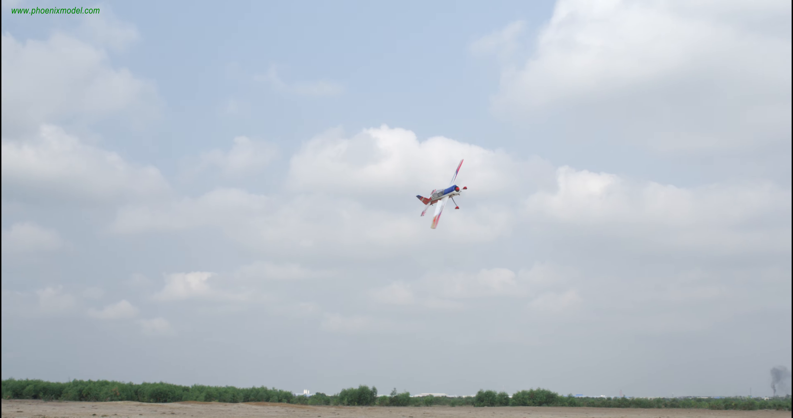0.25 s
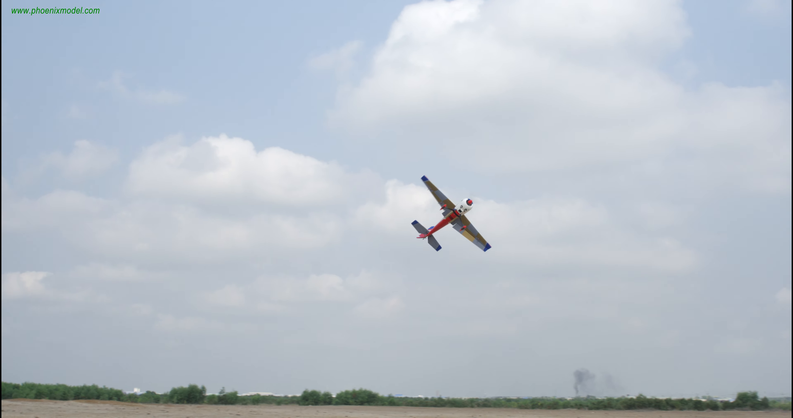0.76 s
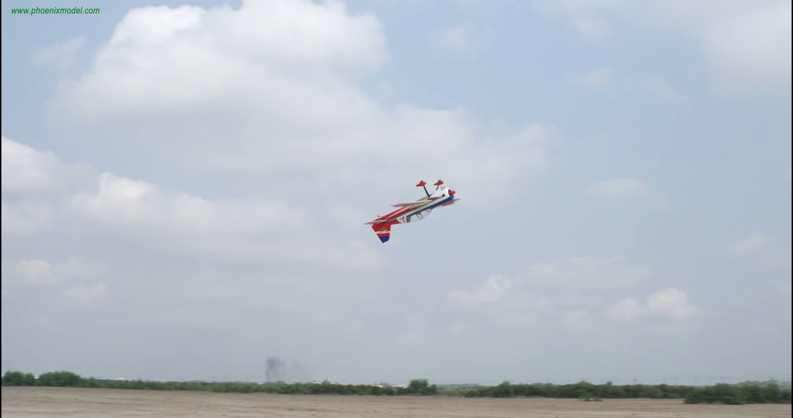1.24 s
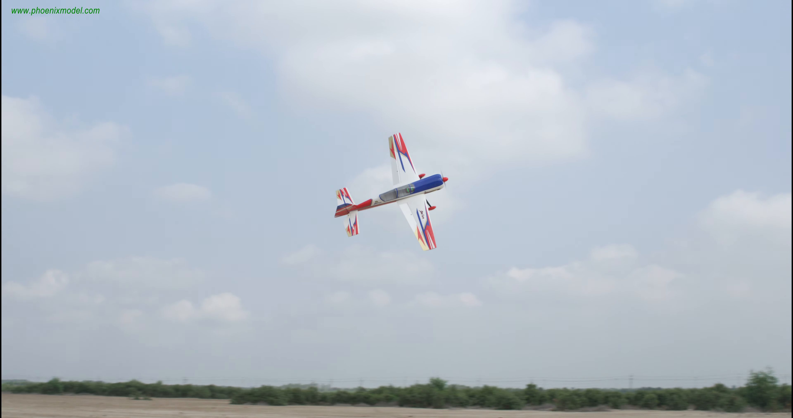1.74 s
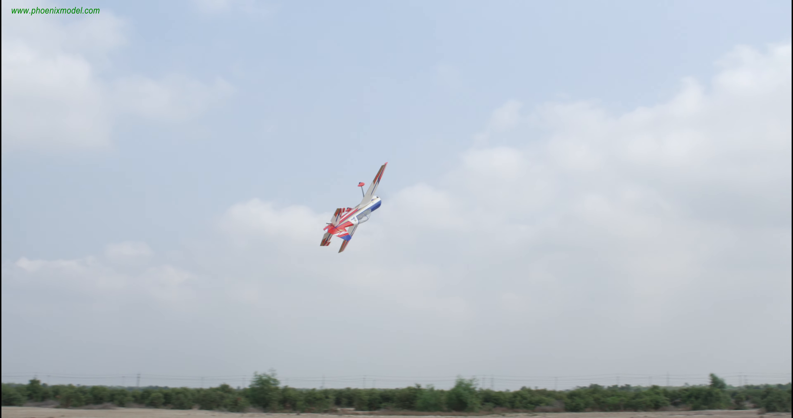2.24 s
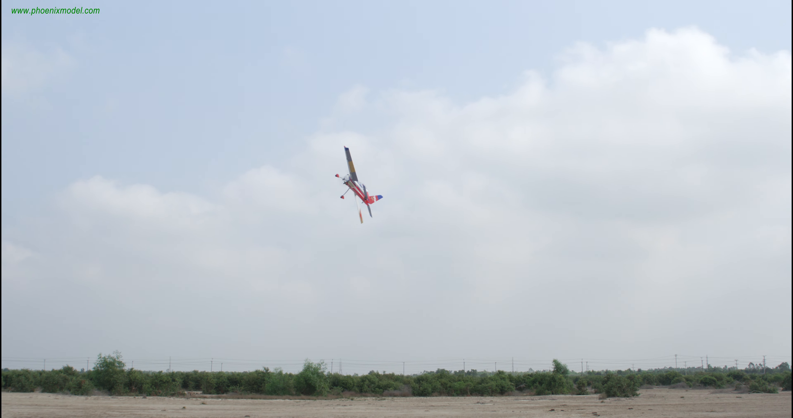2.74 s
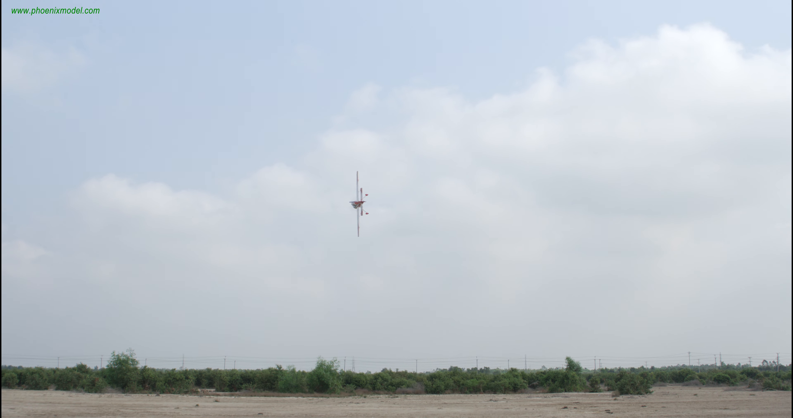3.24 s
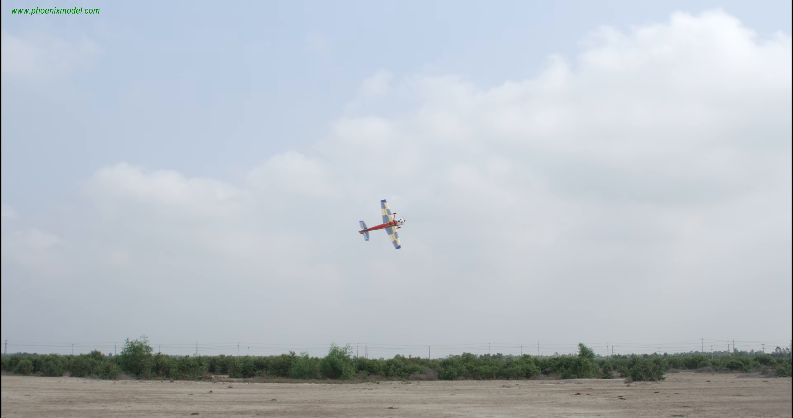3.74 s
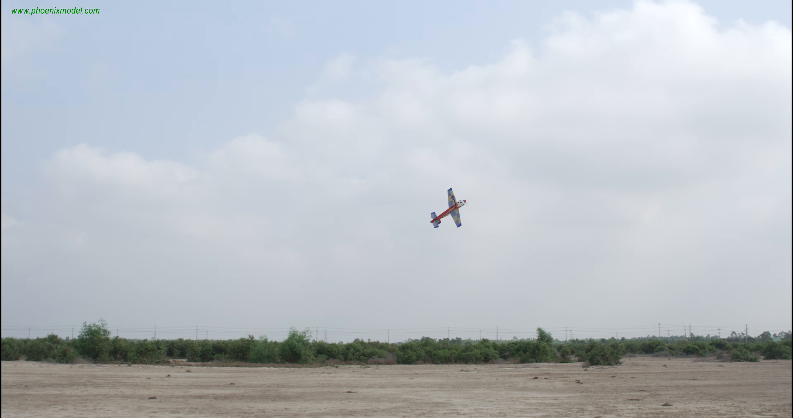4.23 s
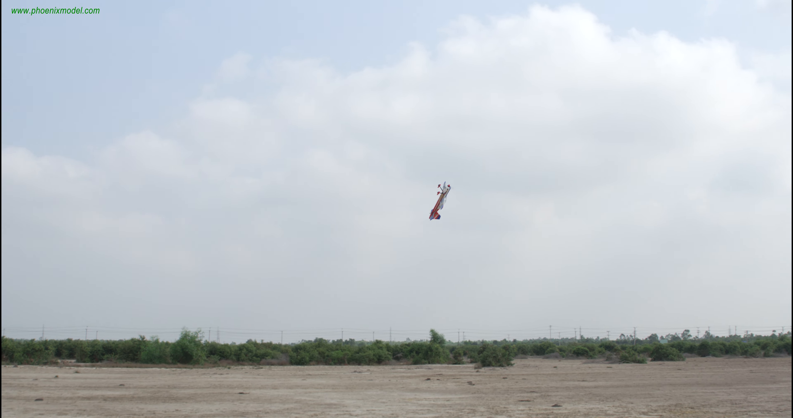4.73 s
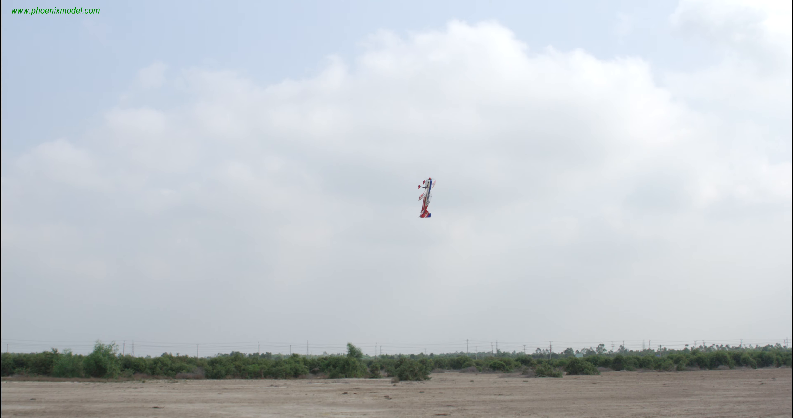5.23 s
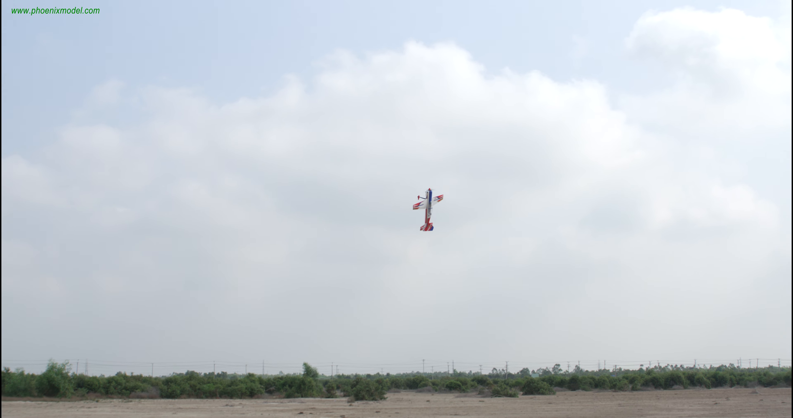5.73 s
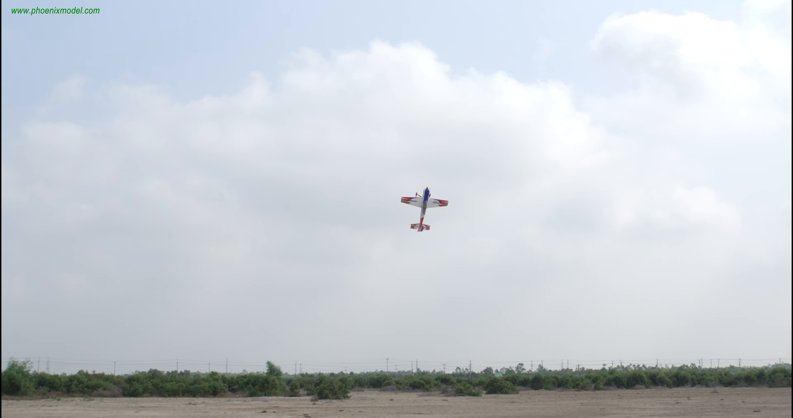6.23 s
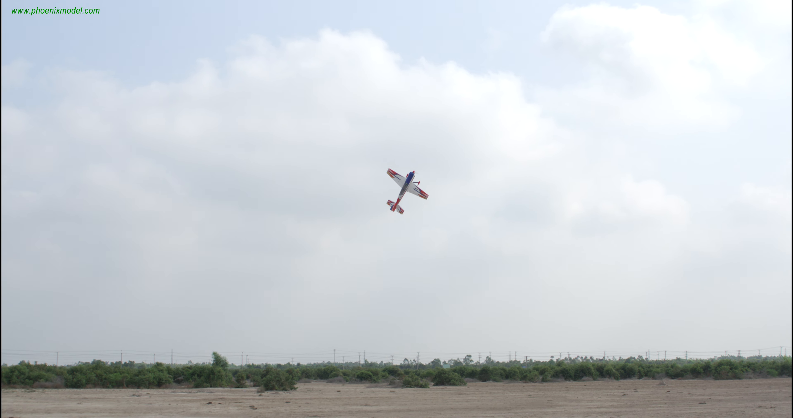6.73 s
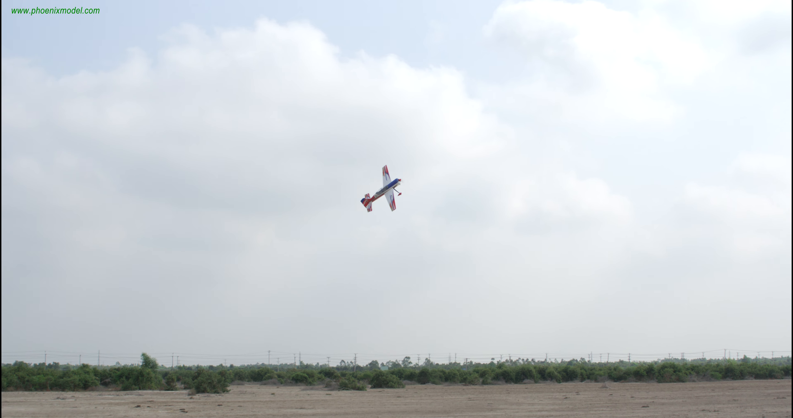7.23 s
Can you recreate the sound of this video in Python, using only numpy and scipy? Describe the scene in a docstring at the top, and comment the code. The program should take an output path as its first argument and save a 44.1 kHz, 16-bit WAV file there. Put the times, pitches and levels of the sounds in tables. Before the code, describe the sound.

Raspy petrol engine of an aerobatic model aircraft revs up and drops repeatedly outdoors, barking under load and sputtering softly between bursts.

```python
"""Open field: an aerobatic model plane tumbles and hovers, its two-stroke petrol engine throttled up and down.
Each revolution sends one exhaust pulse through the silencer: a soft ringing puff when coasting, a hard bark
under load, single bangs where it fires irregularly. Crank and two-blade propeller add low tones, blade tips
a rasp of harmonics; churned air and breeze are filtered noise. Bare ground adds a delayed copy, the hedge
a faint diffuse tail."""
import sys
import numpy as np
from scipy import signal
from scipy.fft import rfft, irfft, next_fast_len
from scipy.io import wavfile
from scipy.ndimage import uniform_filter1d, map_coordinates

SR = 44100
rng = np.random.default_rng(int(sys.argv[2]) if len(sys.argv) > 2 else 0)


def generate_wav(sig):
    """Save sig (samples, or channels by samples) to the path in sys.argv[1] as 16-bit PCM at SR."""
    pcm = np.round(np.clip(np.atleast_2d(sig).T, -1, 1) * 32767).astype(np.int16)
    wavfile.write(sys.argv[1], SR, pcm)


N = 329427

# Single hard firings. Each row: time in seconds, relative crack level in dB, extra treble in dB.
BANG_ROWS = [(0.3963, -27, -6), (0.548, -42, 2.5), (0.7112, -30.5, -2), (0.8745, -45, -13),
             (1.4007, -24.5, -5), (1.4483, -30, 0.5), (1.5494, -25, 2), (1.582, -39, 3.5),
             (1.8647, -23.5, -3), (1.9161, -28, -8), (2.1106, -27, 3), (2.7114, -33, -4), (2.831, -33, -1),
             (3.1684, -31, -9), (3.2316, -30.5, 0.5), (4.212, -22, -12), (4.2336, -30, -1), (4.271, -30, 0),
             (4.472, -31, 4), (4.571, -32.5, 6), (4.617, -30, 4), (4.647, -35, -3), (4.678, -37, 10.5),
             (4.693, -27, -7), (4.7258, -28, 1.5), (4.759, -44, 5.5), (5.032, -24, -5),
             (5.0706, -30.5, 3.5), (5.1553, -24, -6), (5.2046, -32, 4), (5.2541, -31.5, 4),
             (5.2865, -31.5, 4.5), (5.3187, -29.5, 1.5), (5.3511, -33.5, 2), (5.383, -33.5, 3),
             (5.4155, -35.5, 3), (5.497, -30, 3.5), (5.546, -32, 2), (5.5955, -35, 3), (5.6285, -21.5, -12),
             (5.646, -29, -1), (5.7375, -27, -6), (5.822, -24.5, 2.5), (5.864, -43, 6), (6.0786, -31, -3),
             (6.1421, -25, 0.5), (6.7951, -40, 4), (6.9215, -31, 2), (6.9686, -32.5, 2.5), (6.9997, -33, 0),
             (7.2194, -31.5, 8.5), (7.328, -31, 3)]
# Spectrum of the dull body of a pulse. Each row: frequency in Hz, relative level in dB.
BARK_SPECTRUM = [(30, -41.5), (130, 2.5), (250, -6), (400, 4.5), (640, 4.5), (800, -4.5), (1100, -12.5),
                 (2500, -20)]
# Spectrum of its steep front. Each row: frequency in Hz, relative level in dB.
CRACK_SPECTRUM = [(400, -31), (950, 5.5), (1650, 15), (2100, 6.5), (2700, 3.5), (3700, 2.5), (4400, -5),
                  (5100, 3), (7800, -16.5), (9700, -4), (15500, -32)]
# Throttle settings, between which the engine coasts. Each row: opening in seconds, cut in seconds,
# speed at the opening in rev/s, speed at the cut in rev/s, spool time in seconds, then relative levels
# in dB of silencer ring, bark and crack under load, and of the ring when coasting.
THROTTLE_ROWS = [(0.0, 0.349, 70.6, 102.7, 0.24, -21.5, -21.5, -28, -12),
                 (0.544, 0.683, 66.4, 92.5, 0.19, -16, -22.5, -28.5, -15.5),
                 (0.887, 1.068, 58.6, 85, 0.27, -22.5, -24, -30.5, -18.0),
                 (1.073, 1.168, 83, 78, 0.28, -19, -25, -27, -18.0),
                 (1.167, 1.353, 78.5, 94.7, 0.15, -20.5, -22, -29.5, -15),
                 (1.584, 1.81, 64.6, 92, 0.15, -24, -23.5, -30.5, -6.5),
                 (1.918, 2.096, 76, 59.3, 0.52, -19, -27.5, -39.5, -16),
                 (2.16, 2.442, 66, 97, 0.52, -18, -28.5, -31, -7),
                 (2.458, 2.535, 91, 81, 0.16, -25, -25.5, -24.5, -20),
                 (2.535, 2.684, 83, 92, 0.119, -20, -23.5, -39.5, -15),
                 (2.842, 3.131, 66, 92, 0.11, -19.5, -23.5, -37.5, -10.5),
                 (3.25, 3.425, 73.3, 88, 0.046, -17, -25.5, -39, -14),
                 (3.427, 3.685, 89.4, 98, 0.8, -20.5, -22.5, -48.5, -20.0),
                 (3.685, 4.155, 101, 106, 0.45, -32, -19.5, -33, -15),
                 (4.278, 4.439, 77.7, 94, 0.56, -27.5, -19.5, -27.5, -18),
                 (4.755, 5.012, 60.7, 87.6, 1, -24, -23.5, -36, -15),
                 (5.158, 5.636, 63.7, 62, 0.16, -21, -22, -36.5, -16),
                 (5.85, 5.996, 48.1, 77, 0.43, -17.5, -22, -30.5, -20),
                 (6.189, 6.358, 64.2, 88, 0.15, -17.5, -25.5, -33, -18.0),
                 (6.352, 6.541, 90, 82, 0.4, -18, -24, -32, -21.5),
                 (6.546, 6.693, 81.5, 88, 0.38, -16, -22.5, -32.5, -8.5),
                 (6.804, 7.075, 73.5, 59, 0.39, -17.5, -27, -36.5, -16.5),
                 (7.288, 7.481, 47.5, 60.7, 0.032, -17, -24.5, -32, -15)]
# Churned air met when tumbling or hovering. Each row: time in seconds, turbulence from 0 to 1.
TURBULENCE_ROWS = [(1.5, .1), (2.1, .8), (3.6, 0), (4.9, .2), (5.9, .85), (6.4, .35)]
FLYWHEEL_S = 0.04  # smoothing of the speed; settings closer than this count as joined


def amp(db):
    """Decibels to gain."""
    return 10 ** (np.asarray(db) / 20)


def unit(x):
    """Scaled to rms 1."""
    return x / np.sqrt(np.mean(x ** 2) + 1e-20)


def along(points, hz):
    """Gain of (Hz, dB) points joined on a log frequency axis."""
    f, db = np.transpose(points)
    return amp(np.interp(np.log(hz + 1), np.log(f), db))


def curves(rows, t):
    """Each column after the time, interpolated at the times t."""
    s, *cols = np.transpose(rows)
    return [np.interp(t, s, c) for c in cols]


def wobble(rate):
    """Smooth random curve with rate knots a second."""
    knots = rng.standard_normal(int(N * rate / SR) + 4)
    return map_coordinates(knots, [np.arange(N) * rate / SR])


def filtered(x, response):
    """x filtered by a response given as a function of Hz."""
    m = next_fast_len(N + SR // 4)
    return irfft(rfft(x, m) * response(np.fft.rfftfreq(m, 1 / SR)), m)[..., :N]


def causal(gain):
    """Minimum-phase response of this magnitude: sharp start, ringing tail."""
    cepstrum = irfft(np.log(gain + 1e-6))
    half = cepstrum.shape[-1] // 2
    cepstrum[..., 1:half] *= 2
    cepstrum[..., half + 1:] = 0
    return np.exp(rfft(cepstrum))


def placed(starts, rows):
    """Sum of short sounds, each from its own start sample."""
    index = np.maximum(starts, 0)[:, None] + np.arange(rows.shape[1])
    return np.bincount(index.ravel(), rows.ravel(), N)[:N]


def revs(t, coast_s=0.15, grid_s=0.002, min_pause_s=0.02):
    """Speed in rev/s: spools exponentially through each throttle setting, runs down after the cut."""
    opens, cut, start, end, spool_s = np.transpose(THROTTLE_ROWS)[:5]
    grid = np.arange(0, N / SR, grid_s)
    i = np.maximum(np.searchsorted(opens, grid, "right") - 1, 0)
    pause_s = np.maximum(np.append(opens[1:], N / SR + 1) - cut, min_pause_s)

    def ease(age, length, lag):
        """Exponential approach from 0 to 1 within length."""
        return np.expm1(-np.clip(age, 0, length) / lag) / np.expm1(-length / lag)

    speed = start[i] + (end - start)[i] * ease(grid - opens[i], (cut - opens)[i], spool_s[i])
    speed = speed + (np.roll(start, -1) - end)[i] * ease(grid - cut[i], pause_s[i], coast_s)
    smooth = uniform_filter1d(speed, round(FLYWHEEL_S / grid[1]) + 1, mode="nearest")
    return np.interp(t, grid, smooth)


def raggedness(t):
    """Irregularity up to 1: low at speed, high towards idle and in rough air."""
    even_revs = 90 + 16 * curves(TURBULENCE_ROWS, t)[0]
    return np.clip(2 * (even_revs / revs(t) - 1), 0.15, 1)


def strength(t, lead_s=0.016, release_s=0.017, coast_bark_db=-4.5, coast_crack_db=-10, settle=0.4,
             ring_below_revs=70.7, fade_db_per_rev=0.98, surge_s=0.045):
    """Ring, bark and crack of the exhaust in dB: hard under load, a soft ringing puff when coasting."""
    # Change of ring, bark and crack, in dB for each rev/s gained.
    rev_slopes = [0.06, 0.0164, 0.1777]
    # Extra bark and crack, in dB, of the first firings after a pause.
    surge_gains = [6, 6.5]
    opens, cut, start, end, _, *loaded, coast_ring = np.transpose(THROTTLE_ROWS)
    # firing hardens lead_s before the speed turns upwards
    i = np.maximum(np.searchsorted(opens - lead_s, t, "right") - 1, 0)
    speed = revs(t)
    coasting = np.clip((t - cut[i]) / release_s, 0, 1)
    # a setting that follows without a pause takes over gradually
    joined = opens - np.roll(cut, 1) < FLYWHEEL_S
    takeover_s = settle * (cut - opens)[i]
    former = (i > 0) * joined[i] * np.clip(1 - (t - opens[i]) / takeover_s, 0, 1)
    gained = np.where(t < cut[i], speed, end[i]) - (start + end)[i] / 2
    ring, bark, crack = [db[i] + former * (db[i - 1] - db[i]) + slope * gained
                         for db, slope in zip(loaded, rev_slopes)]
    # the can rings less at higher coasting speed
    puff = coast_ring[i] - fade_db_per_rev * np.maximum(speed - ring_below_revs, 0)
    surge = ~joined[i] * np.exp(-np.maximum(t - opens[i], 0) / surge_s)
    return np.array([ring + coasting * (puff - ring),
                     bark + surge * surge_gains[0] + coasting * coast_bark_db,
                     crack + surge * surge_gains[1] + coasting * coast_crack_db])


def air(x, t, treble_hz=6000):
    """The treble comes and goes as the plane turns and drifts."""
    # Each row: time in seconds, gain of the treble in dB.
    treble_rows = [(0, 5), (0.8, -0.5), (0.92, 10.5), (1.1, -2), (1.62, 4.5), (2.33, 2), (2.55, 8),
                   (3.08, -2), (3.3, 5), (5.2, 2.5), (6.7, -4), (7.4, 5)]
    treble = filtered(x, lambda hz: hz ** 4 / (hz ** 4 + treble_hz ** 4))
    return x + (amp(curves(treble_rows, t)[0]) - 1) * treble


def ground(x, t, dull_hz=5000, echo=0.5):
    """Bare soil returns a delayed, duller copy: a comb that sweeps as the plane climbs and sinks."""
    # The lag grows with height. Each row: time in seconds, echo lag in seconds.
    lag_rows = [(.3, .00223), (.7, .00245), (1.1, .00237), (1.42, .0028), (2.05, .003), (2.6, .00258),
                (3.5, .00227), (3.72, .002), (4.15, .00183), (4.7, .00185), (5.7, .0023)]
    late = np.interp(t - curves(lag_rows, t)[0], t, x)
    dull = filtered(late, lambda hz: 1 / np.hypot(1, hz / dull_hz))
    return (x + echo * dull) / np.hypot(1, echo)


def hedge(x, t60_s=0.98, far_hz=1500, size=16384):
    """Diffuse, dull scatter from bushes: convolution with decaying noise."""
    age = np.arange(size) / SR
    tail = rng.standard_normal(size) * amp(-60 * age / t60_s)
    scatter = signal.fftconvolve(x, tail / np.linalg.norm(tail))[:N]
    return filtered(scatter, lambda hz: 1 / (1 + (hz / far_hz) ** 2))


def wash(t, wind_db=-51, hiss_db=-43):
    """Filtered noise: churned air that follows the exhaust, blade hiss, light breeze on the microphone."""
    wash_db = -8.5 + 6 * curves(TURBULENCE_ROWS, t)[0]
    ring_db, bark_db, _ = strength(t)

    def noise(response):
        return unit(filtered(rng.standard_normal(N), response))

    churn = noise(lambda hz: along(BARK_SPECTRUM, hz) / np.hypot(1, (hz / 3500) ** 2))
    breeze = noise(lambda hz: hz / np.hypot(hz, 40) / np.hypot(1, (hz / 150) ** 2))
    hiss = air(noise(lambda hz: along(CRACK_SPECTRUM, hz)), t)
    propeller = amp(wash_db + (ring_db + bark_db) / 2) * churn + amp(hiss_db) * hiss
    return ground(propeller, t) + amp(wind_db + 3 * wobble(1.25)) * breeze


def drone(t, turns, thrum_db=1.0, blade_db=-3, flutter_db=3):
    """Sines at crank rate and, for two blades, twice that; they flutter most when the engine runs ragged."""
    # Each row: time in seconds, relative crank-rate thrum in dB, relative propeller drone in dB.
    drone_rows = [(0.0, -45, -25), (0.35, -44, -52), (0.56, -31, -23.5), (0.75, -49, -53), (0.91, -40, -35),
                  (1.29, -39.5, -58), (2.43, -29.5, -27), (2.52, -31.5, -53), (3.19, -29, -32),
                  (3.25, -27, -23.5), (3.68, -22, -29.5), (4.08, -66, -50), (4.2, -35, -56),
                  (4.85, -41.5, -32.5), (6.99, -34.5, -25.5), (7.37, -37, -25), (7.47, -31, -44)]
    crank_level, blade_level = curves(drone_rows, t)
    flutter = flutter_db * raggedness(t) * wobble(35)
    thrum = amp(crank_level + thrum_db + flutter) * -np.cos(2 * np.pi * turns)
    blades = amp(blade_level + blade_db + flutter) * -np.cos(2 * np.pi * 2 * turns)
    return np.sqrt(2) * (thrum + blades)


def tips(t, turns, blur_turns=0.0021, order=48, rim=0.9):
    """Blade tips: one rasp per turn, harmonics with a bright moving rim; phase wobble blurs the top ones."""
    # Each row: time in seconds, relative level in dB, upper reach in Hz.
    tip_rows = [(1.2, -31, 2503), (1.35, -28, 2980), (1.42, -72, 1989), (2.2, -43, 2794), (2.39, -25, 4407),
                (2.6, -63, 2559), (3.11, -27.5, 2500), (3.2, -47, 1297), (3.55, -32.5, 1747),
                (3.75, -24.5, 2550), (3.95, -26, 3350), (4.13, -26, 3893), (4.22, -32, 3680),
                (4.39, -24.5, 4410), (4.5, -41, 3800)]
    live = (t > tip_rows[0][0]) & (t < tip_rows[-1][0])
    s, turn = t[live], (turns + blur_turns * wobble(140))[live]
    level_db, reach_hz = curves(tip_rows, s)
    share = revs(s) / reach_hz
    buzz = 0
    for k in range(8, order):
        rolloff = (1 + rim * (k * share) ** 4) / (1 + (k * share) ** 12)
        buzz = buzz + np.sin(2 * np.pi * k * turn) * rolloff / np.sqrt(k)
    rasp = np.zeros(N)
    rasp[live] = amp(level_db) * buzz
    return rasp


def crank(t):
    """Crankshaft turns; the exhaust port opens at whole turns, so every bang is bent onto one."""
    turns = np.cumsum(revs(t)) / SR
    bang_s = np.transpose(BANG_ROWS)[0]
    excess = np.unwrap(np.interp(bang_s, t, turns), period=1)
    return turns - np.interp(t, bang_s, excess)


def firings(t, turns, jitter_s=0.0005, scatter_db=3.0, ring_scatter_db=3.0, bang_db=3.5,
            bang_bark_db=3.0, missed_db=-5):
    """Time, ring, bark and crack size, and extra treble in dB of each revolution's pulse."""
    s = np.interp(np.arange(np.ceil(turns[0]), turns[-1]), turns, t)
    chance = rng.standard_normal((len(s), 5)).T
    ragged = raggedness(s)
    spread_db = np.outer([ring_scatter_db, scatter_db, scatter_db], ragged)
    # scatter is half common to the three parts, half their own
    sizes = amp(strength(s) + spread_db * (chance[0] + chance[1:4]) / 2)
    ring, bark, crack = sizes * np.sqrt(SR / revs(s))
    bang_s, level_db, extra_db = np.transpose(BANG_ROWS)
    stroke = np.abs(s - bang_s[:, None]).argmin(axis=1)
    bang, treble_db = np.zeros((2, len(s)))
    bang[stroke] = amp(level_db + bang_db) * np.sqrt(SR / 100)
    treble_db[stroke] = extra_db
    # a weak stroke leaves unburnt charge, which goes off on the next turn
    missed = amp(missed_db * (np.roll(bang, -1) > 0))
    pulse_s = s + jitter_s * ragged ** 3 * chance[4] * (bang == 0)
    bark = np.hypot(missed * bark, bang * amp(bang_bark_db))
    crack = np.hypot(missed ** 2 * crack, bang)
    return pulse_s, missed ** 0.5 * ring, bark, crack, treble_db


def jet(s, crack, jet_db=-6, size=1536):
    """Each pulse leaves the pipe as a burst of bright turbulent noise with a weaker trail."""
    age = np.arange(size) / SR
    decay = np.exp(-age / 0.0014) + 0.09 * np.exp(-age / 0.011)
    shape = decay * (1 - np.exp(-age / 0.0008))
    gate = placed((s * SR).astype(int), np.outer(crack, shape / np.linalg.norm(shape)))

    def colour(hz):
        return causal(unit(along(CRACK_SPECTRUM, hz) * hz / np.hypot(hz, 3500)))

    return amp(jet_db) * filtered(gate * rng.standard_normal(N), colour)


def exhaust(s, ring, bark, crack, treble_db, can_hz=287, can_width_hz=66, edge_db=-1, edge_hz=3000,
            shelf_hz=3800, warming_per_rev=0.0027, middle_revs=80, size=4096):
    """Pulses: the silencer can rings on, the pipe barks, the steep front cracks and rings its overtones."""
    # Pipe overtones. Each row: frequency in Hz, width in Hz, boost in dB.
    overtone_rows = [(1170, 25, 11.5), (1673, 78, 11), (2645, 100, 17.5), (3800, 180, 16.5)]
    hz = np.fft.rfftfreq(size, 1 / SR)
    # no two charges are equally hot, so the resonances shift from pulse to pulse
    heat = 1 + 0.05 * (raggedness(s) * rng.standard_normal(len(s)))[:, None]
    can = hz * can_width_hz / np.hypot((can_hz * heat) ** 2 - hz ** 2, hz * can_width_hz)
    can = can / np.hypot(1, (hz / 520) ** 2) / np.hypot(1, (170 / (hz + 1)) ** 3)
    # hotter gas at higher speed raises the overtones
    warm = np.sqrt(heat) + warming_per_rev * (revs(s)[:, None] - middle_revs)
    overtones = amp(sum(db / (1 + ((hz - f * warm) / width) ** 2) for f, width, db in overtone_rows))
    shelf = amp(np.outer(treble_db, hz ** 4 / (hz ** 4 + shelf_hz ** 4)))
    front = amp(edge_db) * unit(along(CRACK_SPECTRUM, hz) * overtones) * shelf / np.hypot(1, hz / edge_hz)
    body = along(BARK_SPECTRUM, hz) / np.hypot(1, (hz / edge_hz) ** 2)
    power = (ring[:, None] * unit(can)) ** 2 + np.outer(bark, unit(body)) ** 2 + (crack[:, None] * front) ** 2
    start, fraction = np.divmod(s * SR, 1)
    subsample_delay = np.exp(-2j * np.pi * np.outer(fraction, hz) / SR)
    return -placed(start.astype(int), irfft(causal(np.sqrt(power)) * subsample_delay))


def pipe(x, delay_hz=420, q=0.72):
    """All-pass: the pipe delays its own pitches, so that each pulse swells over a cycle or two."""
    def pole(hz):
        return delay_hz ** 2 - hz ** 2 + 1j * hz * delay_hz / q

    return filtered(x, lambda hz: np.conj(pole(hz)) / pole(hz))


def ports(mid, scatter_s=0.00075, size=512):
    """Difference between two microphone ports: faint scatter from close by."""
    # Each row: frequency in Hz, side against mid in dB.
    width_rows = [(80, -55), (900, -21), (12000, -18.5)]
    tail = rng.standard_normal(size) * np.exp(-np.arange(size) / SR / scatter_s)
    near = signal.fftconvolve(mid, tail / np.linalg.norm(tail))[:N]
    return filtered(near, lambda hz: along(width_rows, hz))


def scene(hedge_db=-19):
    """The plane stays in the centre, with a little width above the bass."""
    t = np.arange(N) / SR
    turns = crank(t)
    s, ring, bark, crack, treble_db = firings(t, turns)
    pulses = pipe(exhaust(s, ring, bark, crack, treble_db)) + jet(s, crack * amp(treble_db))
    engine = ground(air(pulses + tips(t, turns), t), t)
    mid = engine + drone(t, turns) + amp(hedge_db) * hedge(engine) + wash(t)
    side = ports(mid)
    return np.array([mid + side, mid - side])


def record(dry, dip_width_hz=350, ceiling=0.72, top_hz=15900):
    """Microphone: dips in its response, soft clipping of the loudest peaks, band limit."""
    # Each row: frequency in Hz, depth in dB.
    dip_rows = [(3100, -2), (5945, -15), (6880, -16), (8550, -4.5), (9950, -4.5), (11100, -4.5)]

    def colour(hz):
        return causal(amp(sum(db * np.exp(-((hz - f) / dip_width_hz) ** 2) for f, db in dip_rows)))

    x = filtered(dry, colour)
    x = x / (1 + np.abs(x / ceiling) ** 6) ** (1 / 6)
    return filtered(x, lambda hz: hz < top_hz)


dry = scene()
out = record(dry)
generate_wav(out)
```